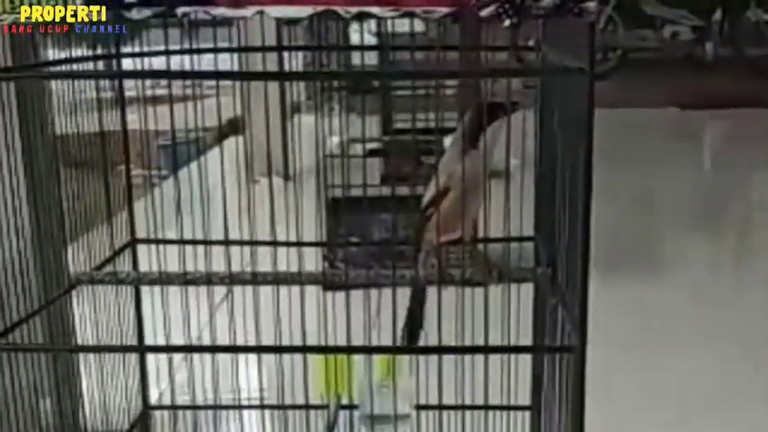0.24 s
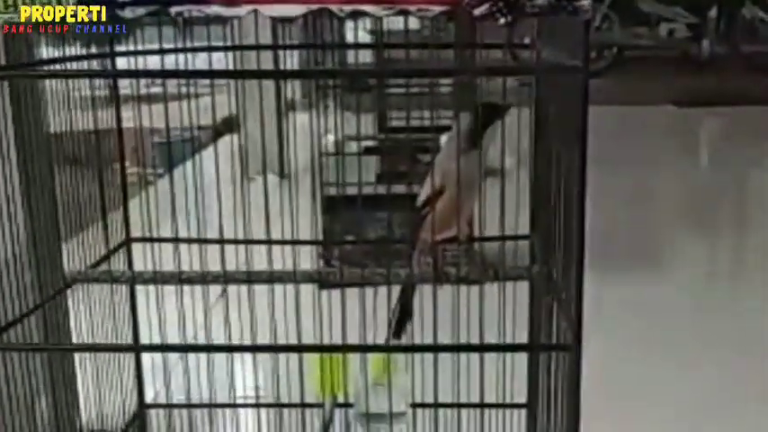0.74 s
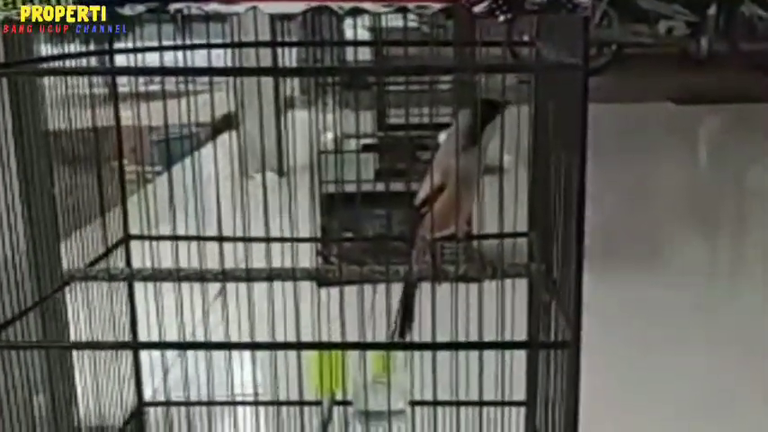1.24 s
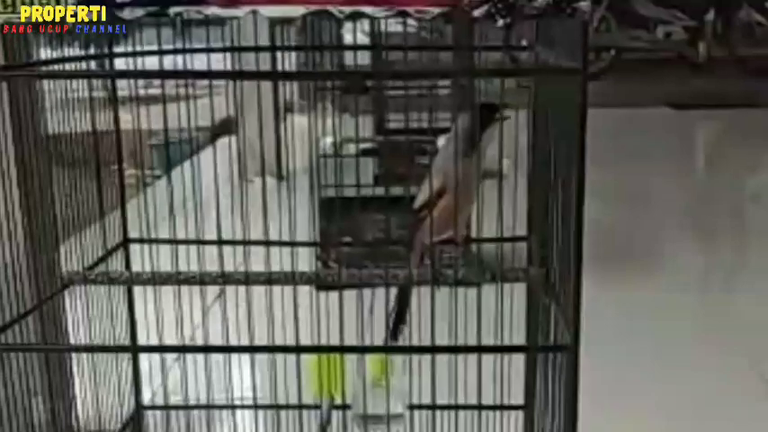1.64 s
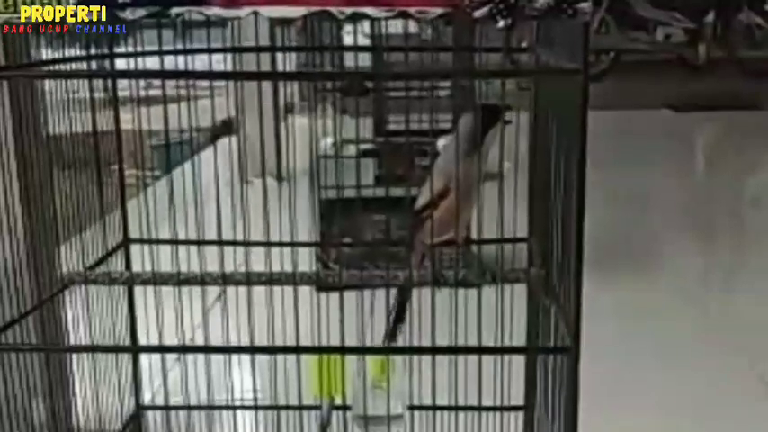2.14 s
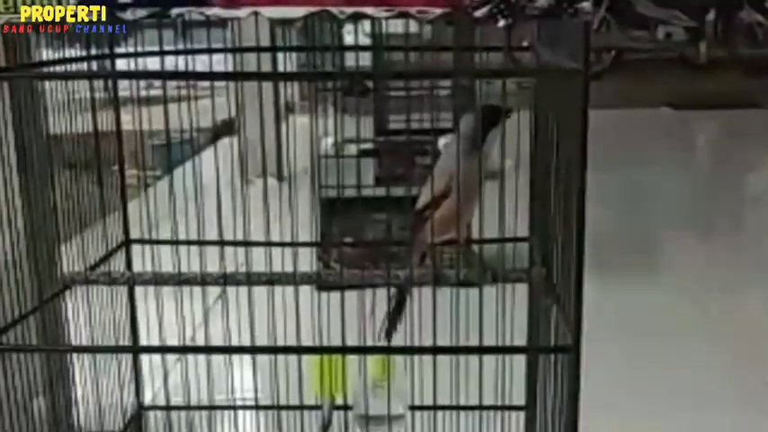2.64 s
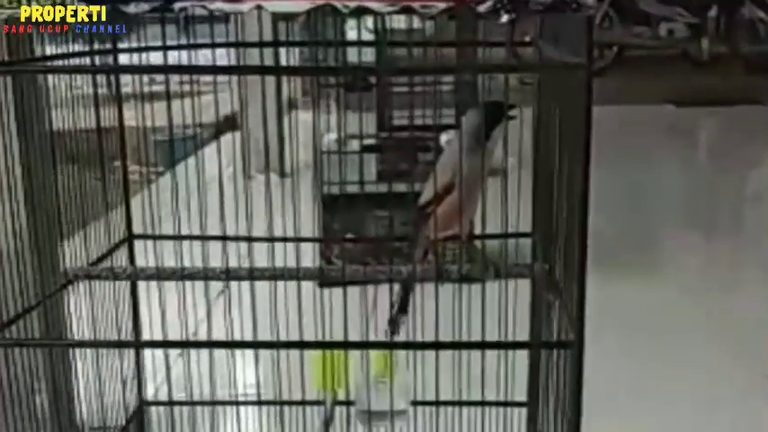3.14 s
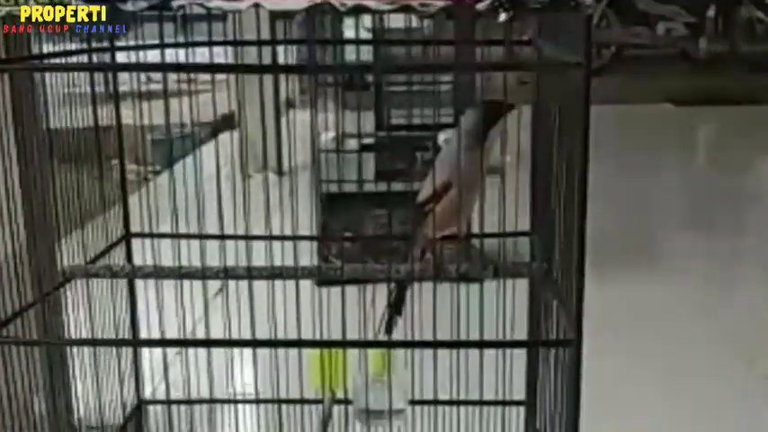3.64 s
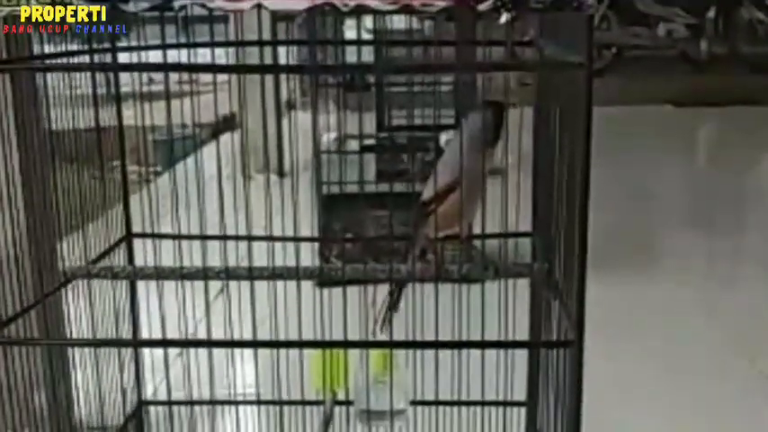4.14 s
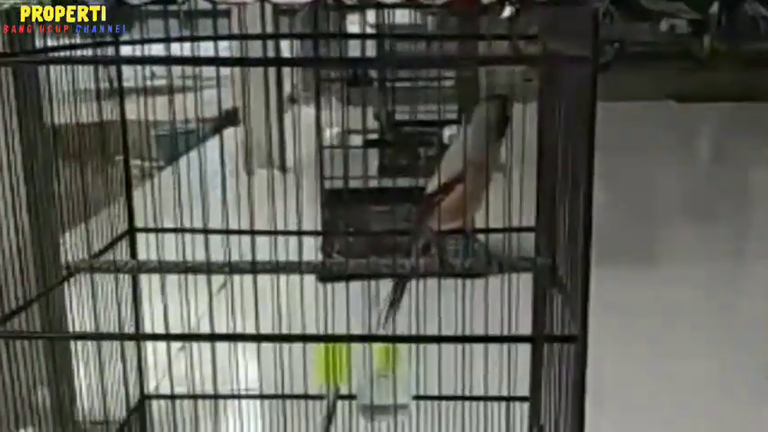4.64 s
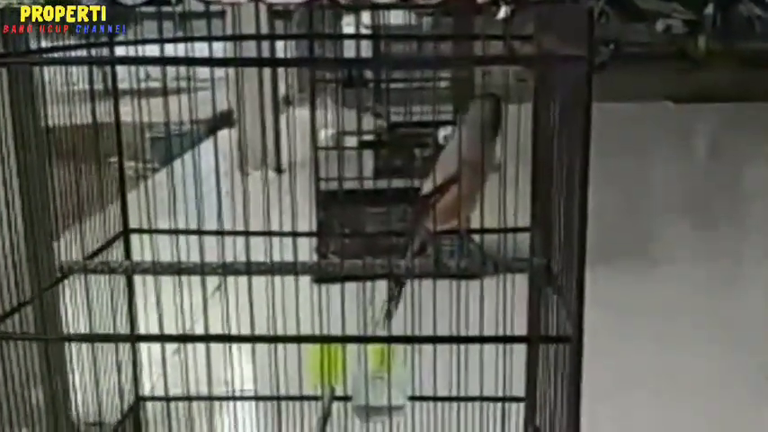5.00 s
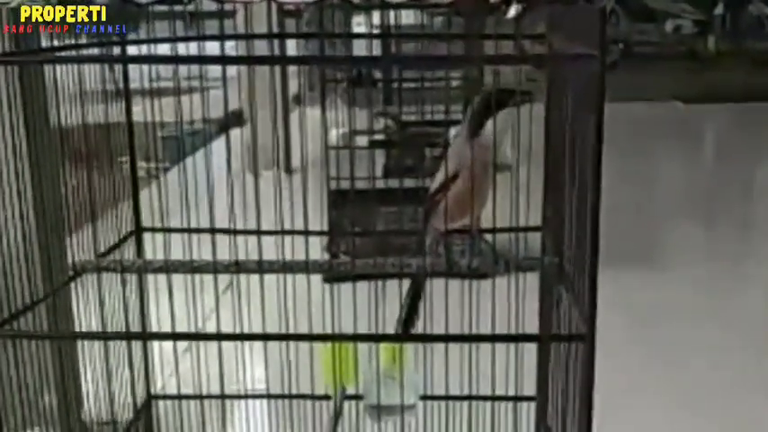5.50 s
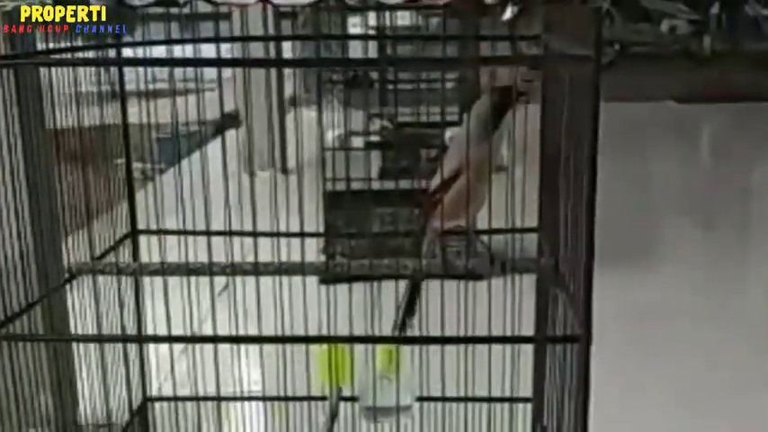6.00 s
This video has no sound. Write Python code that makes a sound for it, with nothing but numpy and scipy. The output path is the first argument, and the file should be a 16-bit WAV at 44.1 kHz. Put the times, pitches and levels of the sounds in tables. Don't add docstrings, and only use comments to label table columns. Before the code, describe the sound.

Close scratchy bird song with beak clicks rings off hard porch walls, over low traffic rumble, distant crowing and soft dove coos.

```python
import sys
import numpy as np
from scipy import signal
from scipy.fft import rfft, irfft
from scipy.io import wavfile
from scipy.ndimage import uniform_filter1d

SR = 44100
rng = np.random.default_rng(int(sys.argv[2]) if len(sys.argv) > 2 else 0)


def voltage_ratio(decibels):
    exponent = np.asarray(decibels, float) / 20
    return 10 ** exponent


def generate_wav(sig):
    pcm = np.round(np.clip(np.atleast_2d(sig).T, -1, 1) * 32767).astype(np.int16)
    wavfile.write(sys.argv[1], SR, pcm)


N = 276049
RUN_IN = 4410
POSES = 3


def at_hz(points, hz):
    table_hz, values = np.transpose(points)
    return np.interp(np.log(hz), np.log(table_hz), values)


def wobble(count, hz):
    slow = signal.lfilter([1], [1, -np.exp(-2 * np.pi * hz / SR)], rng.standard_normal(count + 300))[300:]
    return slow / slow.std()


def add(track, sound, s):
    i = RUN_IN + round(s * SR)
    track[i:i + len(sound)] += sound[:len(track) - i]


# frequency in Hz, level in dB.
OPEN_BEAK = [(1200, 5), (1600, -12.5), (2500, 0), (5000, 8), (6100, 4), (7000, -0.5), (8500, 7),
             (10100, 2.5), (11500, 10.5), (13000, 5.5), (14500, -5.5), (16000, -19)]
# frequency in Hz, level in dB.
SHUT_BEAK = [(1200, 3), (1800, -15), (3000, 13), (5600, -13.5), (7500, -5), (9500, -27), (11300, 8.5),
             (12500, 0.5), (14000, -1.5), (16000, 0.5)]


def syrinx(rows, colour=OPEN_BEAK):
    throat_width_hz, throat_skirt = 1790, 1.28
    pitch_jitter, overtone_scatter_db = 0.2155, 1.8
    breathy_rad, breathy_hz, flutter_db = 0.11, 328, 2
    s, *columns = np.transpose(rows)
    t = np.arange(s[0], s[-1], 1 / SR)
    hz, level_db, throat_hz, overtone_db, rough = [np.interp(t, s, column) for column in columns]
    hz = hz * (1 + pitch_jitter * rough * np.clip(wobble(len(t), 468), -2.5, 2.5))
    partials = np.arange(1, 15)[:, None] * hz

    throat = 1 / (1 + (2 * (partials - throat_hz) / throat_width_hz) ** 2) ** throat_skirt
    scatter_db = overtone_scatter_db * rng.standard_normal((len(partials), 1))
    heights = throat + voltage_ratio(overtone_db + at_hz(colour, partials) + scatter_db)
    heights *= partials < 16500
    heights /= np.sqrt(np.sum(heights ** 2, axis=0) / 2 + 1e-9)

    phases = 2 * np.pi * (np.cumsum(partials, axis=1) / SR + rng.random((14, 1)))
    for order in range(2, 14):
        phases[order] += breathy_rad * order * wobble(len(t), breathy_hz)
    level_db = level_db + flutter_db * rough * wobble(len(t), 280)
    edges = np.sin(np.clip(np.minimum(t - s[0], s[-1] - t) / .004, 0, 1) * np.pi / 2) ** 2
    return np.sum(heights * np.sin(phases), axis=0) * voltage_ratio(level_db) * edges


# time after the start in seconds, pitch in Hz,
# level in dB, throat resonance in Hz, overtone strength in dB, roughness from 0 to 1.
TICK_SHAPE = [(0, 3210, 0.5, 3150, -73, 0.17), (.009, 2786, -2.5, 5370, -15, 0.13),
              (.02, 2760, 4, 5350, -5.5, 0.08), (.026, 2243, 5, 4730, -40.5, 0.51),
              (.032, 2746, -6, 3940, 32, 0.39), (.04, 4360, 18.5, 4430, -14, 0.56)]
RISE_SHAPE = [(-.004, 1381, 9, 2660, -59, 0.039), (.004, 1515, -4, 2755, -19.5, 0.062),
              (.03, 1696, 1.5, 3350, -11, 0.067), (.04, 2038, 3, 3440, 3, 0.16),
              (.048, 2380, 0, 4750, -11.5, 0.094), (.06, 2486, 6.5, 4620, -12, 0.74)]
CHACK_SHAPE = [(-.004, 1848, -14, 4000, -28, 0.084), (.008, 2270, 2.5, 4730, 20, 0.073),
               (.024, 2454, -5, 5080, -47, 0.13), (.032, 2300, -24, 4670, -5, 0.875),
               (.038, 2700, 4.5, 5200, -25, .7), (.044, 3490, -6, 4440, -2, 0.98)]
OPENER_SHAPE = [(0, 1748, 5, 3610, -22, 0.063), (.006, 2015, 4, 4050, -22.5, 0.023),
                (.026, 2051, 2, 4063, -24, 0.02), (.032, 2150, -6, 2340, -5.5, 0.039),
                (.043, 2350, 0, 2350, -20, .03), (.052, 2780, -5.5, 2776, -25, 0.1),
                (.095, 2710, -8, 2700, -38, 0.33)]
DOUBLE_SHAPE = [(-.002, 1480, 8.5, 3280, 7, 0.057), (.007, 1829, 8.5, 3670, -16, 0.044),
                (.029, 1891, 8, 3870, -21, 0.027), (.035, 2105, -3, 2320, -13, 0.041),
                (.046, 2350, 7, 2350, -1, .03), (.06, 2724, -3.5, 2800, -51, 0.05),
                (.09, 2883, 2, 2830, -46, 0.089)]
STEP_SHAPE = [(0, 1444, -2, 3100, -16, 0.019), (.009, 1822, 2.5, 3470, -17, 0.025),
              (.034, 1860, 3, 3600, -34, 0.039), (.038, 2045, -9.5, 2300, -10, 0.027),
              (.047, 2335, 0, 2380, -18, .03), (.056, 2950, 2.5, 2900, -14, .05),
              (.066, 2730, -11, 2830, -35, .1), (.09, 2840, -8, 2750, -40, .15)]
CHECK_SHAPE = [(0, 1920, -10, 6100, -11, .15), (.007, 2282, 2.5, 6700, -5, 0.16),
               (.012, 2425, 4, 5000, -16, 0.16), (.022, 2560, -0.5, 5100, -17, .2),
               (.034, 2424, 5.5, 4840, 3, 1)]
BRIDGE_SHAPE = [(0, 1580, 0, 3140, -37, .03), (.007, 1754, -5.5, 3530, -17, 0.17),
                (.03, 1843, -3, 3310, -7.5, 0.024), (.04, 2150, -7, 4300, 10.5, .15),
                (.052, 2445, 4, 4400, -16, 0.52)]
LIFT_SHAPE = [(0, 1600, 0, 3230, 2, 0.049), (.02, 1890, 3.5, 3720, -8, 0.04),
              (.025, 2090, -7.5, 2100, -9, 0.037), (.036, 2140, 4, 2150, -2, 0.056),
              (.043, 2700, -5.5, 2750, -11, .08), (.048, 2990, 3, 2980, -14, 0.034),
              (.066, 3020, -1, 3020, -25, .06)]
HOARSE_SHAPE = [(0, 1100, -1, 3420, -29, 0.43), (.02, 1503, -2, 4170, -22, 0.37),
                (.044, 1530, -6, 4000, -18, .45)]
RASP_SHAPE = [(0, 1106, -9.5, 3630, -19, 0.033), (.013, 1556, 3.5, 2870, -31.5, 0.074),
              (.036, 1604, -4.5, 2920, -7, 0.06), (.05, 1525, -13.5, 3400, -3, 0.16),
              (.07, 1080, 3.5, 3600, -31, 0.72)]
MUTTER_SHAPE = [(0, 2324, -5, 4500, -34, 0.79), (.035, 2178, -5.5, 4430, -19, 0.41),
                (.065, 2036, 4, 4030, -26, 0.41)]
# start in seconds, level in dB, pitch factor, length factor.
TICKS = [(-0.033, -25, 0.96, 1), (0.133, -23.5, 1.05, .76), (0.269, -23.5, 0.94, 0.73),
         (0.417, -24.5, 0.95, 0.71), (0.562, -23.5, 0.93, 0.79), (0.721, -21, 0.96, 0.82),
         (4.272, -27, 1.03, 0.83), (4.439, -27, .93, 0.65), (4.585, -22.5, 0.9, 0.61),
         (4.73, -24.5, 0.92, 0.88), (4.884, -22.5, 0.92, 0.63)]
RISES = [(1.668, -21, 1.07, 0.85), (1.801, -21, 1.064, 0.77), (1.925, -20, 1.08, 1.01),
         (2.058, -22.5, 1.08, 0.88), (2.198, -22, 1.105, 0.93), (2.324, -22.5, 1.096, 1.04),
         (2.461, -21, 1.09, 0.88), (2.616, -19.5, 1.134, 0.79), (2.772, -20.5, 1.097, 0.89),
         (5.63, -20, 1.1, 0.85), (5.754, -20.5, 1.09, 0.96), (5.886, -20.5, 1.073, 0.78),
         (6.007, -22, 1.07, 0.81), (6.137, -22, 1.08, 0.97)]
CHACKS = [
    (3.374, -16, 1.0, .75),
]
OPENERS = [
    (.974, -22.5, .99, .94),
    (5.082, -23.5, 0.97, .82),
]
DOUBLES = [
    (1.133, -30, 1.0, 0.87),
    (5.234, -27.5, 1.01, 0.68),
]
STEPS = [
    (1.284, -22.5, 0.97, 0.86),
]
CHECKS = [
    (3.585, -17, 0.97, 0.94),
]
BRIDGES = [
    (1.429, -17, 0.98, 0.8),
    (1.548, -15.5, 0.99, 0.91),
    (5.507, -16, 1.02, 0.91),
]
LIFTS = [
    (5.384, -23, 0.96, 0.82),
]
HOARSE = [
    (3.188, -21.5, 0.92, 1),
]
RASPS = [
    (3.044, -21.5, 1.023, 1.06),
    (3.122, -21.5, 1.025, 0.89),
]
MUTTERS = [
    (0.904, -26, 1.01, 0.91),
]
# time in seconds, extra overtone strength in dB.
BEAK = [(0, 6), (1.0, 0), (1.13, -11), (1.29, 1.5), (1.43, -22.5), (1.55, -16), (1.95, -10.5), (2.8, -7.5),
        (3.05, -6.5), (3.4, 9), (3.6, -4), (4.9, 2), (5.1, -3.5), (5.4, -8), (5.51, -26.5), (5.64, -6.5),
        (6.2, -4)]


def sung_notes():
    pitch_scatter, level_scatter_db = .012, 2
    poses = np.zeros((POSES, RUN_IN + N))
    kinds = [(TICK_SHAPE, TICKS, .94, OPEN_BEAK), (RISE_SHAPE, RISES, .91, OPEN_BEAK),
             (CHACK_SHAPE, CHACKS, 1, OPEN_BEAK), (OPENER_SHAPE, OPENERS, 1, OPEN_BEAK),
             (DOUBLE_SHAPE, DOUBLES, 1, SHUT_BEAK), (STEP_SHAPE, STEPS, 1, SHUT_BEAK),
             (CHECK_SHAPE, CHECKS, 1, OPEN_BEAK), (BRIDGE_SHAPE, BRIDGES, 1, OPEN_BEAK),
             (LIFT_SHAPE, LIFTS, 1, SHUT_BEAK), (HOARSE_SHAPE, HOARSE, 1, OPEN_BEAK),
             (RASP_SHAPE, RASPS, 1, OPEN_BEAK), (MUTTER_SHAPE, MUTTERS, 1, OPEN_BEAK)]
    for shape, notes, sag, colour in kinds:
        for k, (s, level_db, pitch, length) in enumerate(notes):
            beak_db = np.interp(s, *np.transpose(BEAK))
            rows = np.array(shape) * [length, 1, 1, 1, 1, 1]
            rows = rows + [s, 0, level_db - 2, 0, beak_db + 8, 0]
            rows[:, [1, 3]] *= pitch * np.linspace(1, sag, len(rows))[:, None]
            if len(notes) > POSES:
                chance = rng.standard_normal((len(rows), 2))
                rows[:, [1, 3]] *= 1 + pitch_scatter * chance[:, :1]
                rows[:, 2] += level_scatter_db * chance[:, 1]
            add(poses[k % POSES], syrinx(rows, colour), rows[0, 0])
    return poses


# time after the start in seconds, pitch in Hz, level in dB, throat
# resonance in Hz, overtone strength in dB, roughness from 0 to 1.
GRACE_SHAPE = [(0, 1560, -10, 1550, -43, .02), (.012, 1700, -12, 1650, -40, .02),
               (.024, 1720, 4.5, 1740, -40, .02)]
# start in seconds, level in dB.
GRACES = [(0.154, -49), (0.445, -48), (0.599, -45), (0.874, -60), (4.25, -50), (4.41, -50), (4.561, -53),
          (4.712, -46), (4.86, -46.5), (5.041, -54)]


def grace_notes():
    out = np.zeros(RUN_IN + N)
    for s, level_db in GRACES:
        add(out, voltage_ratio(level_db) * syrinx(GRACE_SHAPE), s)
    return out


# start in seconds, length in seconds, first pitch in Hz, last pitch in Hz, level in dB.
SQUEAKS = [
    (3.838, 0.019, 6890, 5390, -16.5),
    (3.839, 0.012, 4830, 5130, -20),
    (3.853, 0.02, 3350, 4000, -27),
    (3.86, 0.016, 6400, 7590, -26),
]
WHISTLES = [
    (4.091, 0.0193, 7080, 5655, -21.5),
    (4.11, 0.0153, 6380, 6580, -18),
]


def squeaks():
    onset_db, end_db = -10.5, 1
    out = np.zeros(RUN_IN + N)
    # calls, overtone strength in dB, roughness
    for calls, overtone_db, rough in [(SQUEAKS, 0.56, 0.185), (WHISTLES, -14.5, 0.027)]:
        for s, length, first_hz, last_hz, db in calls:
            middle_hz = (first_hz + last_hz) / 2
            rows = [(0, first_hz, db + onset_db, first_hz, overtone_db, rough),
                    (length / 2, middle_hz, db, middle_hz, overtone_db, rough),
                    (length, last_hz, db + end_db, last_hz, overtone_db, rough)]
            add(out, syrinx(rows), s)
    return out


# time in seconds, peak level in dB.
SNAPS = [(.153, -17), (.292, -15), (.438, -19), (.738, -15), (1.342, -18), (1.464, -14), (1.717, -14),
         (2.502, -12), (2.515, -15), (2.71, -20), (3.126, -18), (3.403, -10), (3.865, -12), (4.294, -17),
         (4.598, -16), (4.759, -13), (4.91, -16), (5.432, -14), (5.552, -14)]


def snaps():
    clicks = np.zeros(RUN_IN + N) + 1e-18
    for s, level_db in SNAPS:
        add(clicks, voltage_ratio(level_db) * np.array([1., -1.]), s)
    return signal.sosfilt(signal.butter(2, [3000, 11100], "band", fs=SR, output="sos"), clicks)


def songbird():
    poses = sung_notes()
    poses[0] += grace_notes() + snaps()
    poses[1] += squeaks()
    return signal.sosfilt(signal.butter(3, 1200, "high", fs=SR, output="sos"), poses + 1e-18)


# frequency in Hz, time to fall 60 dB in seconds.
PORCH_T60 = [(1000, 0.29), (2000, 0.35), (4000, 0.42), (8000, 0.42), (14000, 0.33)]
# frequency in Hz, level in dB.
PORCH_COLOUR = [(1000, -4.5), (2200, -0.5), (4000, 0.5), (8000, -1), (14000, -0.5)]


def porch(x):
    port_lag, left_db = 6, 0.64
    near_walls_db, near_walls_t60_s, first_echo_s = 3, 0.085, .012
    shared = np.sqrt(0.043)
    t = np.arange(int(.8 * SR)) / SR
    white = rng.standard_normal((2, 3, len(t)))
    edges = 700 * 2 ** np.arange(0, 5, .5)
    tail = 0
    for k, (low, high) in enumerate(zip(edges, edges[1:])):
        centre = np.sqrt(low * high)
        band = signal.sosfilt(signal.butter(2, [low, high], "band", fs=SR, output="sos"), white[k % 2])
        tail = tail + band * voltage_ratio(at_hz(PORCH_COLOUR, centre) - 60 * t / at_hz(PORCH_T60, centre))
    tail = tail * (1 + voltage_ratio(near_walls_db - 60 * t / near_walls_t60_s))
    tail = tail * np.clip(t / first_echo_s, 0, 1)
    tail /= np.sqrt(np.sum(tail ** 2) / 3)
    common = shared * tail[0]
    common[0] = 1
    own = np.sqrt(1 - shared ** 2) * tail[1:]
    response = np.array([np.roll(common, port_lag), common]) + own
    heard = signal.fftconvolve(x[None], response, axes=1)[:, RUN_IN:RUN_IN + N]
    return heard * voltage_ratio([[left_db], [-left_db]])


def far_calls(calls, orders, hoarse):
    out = np.zeros(RUN_IN + N)
    for rows in calls:
        s, hz, level_db = np.transpose(rows)
        t = np.arange(s[0], s[-1], 1 / SR)
        unsteady_hz = np.interp(t, s, hz) * (1 + hoarse * wobble(len(t), 66))
        phase = 2 * np.pi * np.cumsum(unsteady_hz) / SR
        tone = sum(voltage_ratio(order_db) * np.sin(k * phase) for k, order_db in orders)
        edges = np.clip(np.minimum(t - s[0], s[-1] - t) / 0.017, 0, 1)
        add(out, tone * edges * voltage_ratio(np.interp(t, s, level_db)), s[0])
    return out[RUN_IN:]


def sliding_calls(calls):
    peak, onset_db, end_db = 0.64, 1.5, -13.5
    return [[(s, first_hz, db + onset_db),
             (s + peak * length, first_hz + peak * (last_hz - first_hz), db),
             (s + length, last_hz, db + end_db)] for s, length, first_hz, last_hz, db in calls]


# start in seconds, length in seconds, first pitch in Hz, last
# pitch in Hz, level in dB.
COCK_LOW = [(.43, 0.25, 1082, 1140, -62), (.85, 0.44, 1104, 1109, -61.5), (1.17, 0.21, 1126, 1120, -59),
            (1.4, 0.1, 1077, 1100, -55), (1.69, 0.11, 1082, 1160, -57), (1.9, 0.59, 1085, 1081, -61),
            (2.4, 0.22, 1097, 1097, -57.5), (2.67, 0.13, 1073, 1098, -53), (2.86, 0.18, 1090, 1096, -55.5),
            (3.1, 0.25, 1103, 1086, -55), (3.46, 0.43, 1081, 1076, -52.5)]
COCK_HIGH = [
    (3.24, 0.22, 1600, 1510, -56),
    (3.92, .4, 1590, 1523, -53.5),
]


def cockerels():
    low = far_calls(sliding_calls(COCK_LOW), [(.5, -16.5), (1, 0), (1.5, -4.5)], hoarse=0.017)
    high = far_calls(sliding_calls(COCK_HIGH), [(.5, -7.0), (1, 4.0)], hoarse=0.0084)
    return low + high


# time after the start in seconds, pitch in Hz, level in dB.
COO = [
    [(0, 630, -57), (.04, 640, -50), (.1, 640, -71)],
    [(.3, 620, -62), (.34, 640, -49), (.39, 730, -46.5), (.46, 720, -46.5), (.5, 640, -45), (.54, 620, -59)],
    [(.72, 620, -49), (.8, 640, -58.5), (.92, 670, -51), (1.04, 635, -48.5), (1.15, 600, -57),
     (1.27, 540, -56.5)],
]
COO_STARTS = [
    .74,
    4.97,
]
# start in seconds, length in seconds, first
# pitch in Hz, last pitch in Hz, level in dB.
STRAY_TONES = [
    (2.4, 0.19, 620, 582, -55.5),
    (2.95, 0.13, 616, 664, -59.5),
    (3.11, 0.193, 777, 680, -56),
    (4.22, 0.26, 715, 685, -63),
]


def dove():
    phrases = [np.array(note) + [start, 0, 0] for start in COO_STARTS for note in COO]
    return far_calls(phrases + sliding_calls(STRAY_TONES), [(1, 0)], hoarse=.04)


# start in seconds, length in seconds, first pitch in Hz, last pitch in Hz, level in dB.
FAR_CHIRPS = [
    (3.95, 0.068, 3140, 3250, -45),
    (4.06, 0.11, 2516, 2710, -47.5),
    (4.225, 0.053, 2755, 2930, -46),
]


def small_bird():
    return far_calls(sliding_calls(FAR_CHIRPS), [(0.98, 0.0029)], hoarse=0.021)


def yard(x):
    t = np.arange(int(.5 * SR)) / SR
    echoes = rng.standard_normal((2, len(t))) * voltage_ratio(-60 * t / .6)
    echoes /= np.sqrt(np.sum(echoes ** 2) / 2)
    echoes[:, 0] = .6
    return signal.fftconvolve(x[None], echoes, axes=1)[:, :N] * voltage_ratio([[-1.2], [1.2]])


# time in seconds, level in dB.
LORRY = [
    (5.4, -67),
    (5.9, -61),
    (6.26, -53.5),
]


def lorry():
    drone = signal.sosfilt(signal.butter(2, [30, 183], "band", fs=SR, output="sos"), rng.standard_normal(N))
    return drone / drone.std() * voltage_ratio(np.interp(np.arange(N) / SR, *np.transpose(LORRY)))


# frequency in Hz, level in dB per Hz.
RUMBLE = [(12, -4), (28, 5), (42, -16), (62, 4), (80, 1.5), (125, -6), (170, -11.5), (260, -17.5),
          (480, -22.5), (900, -21), (1350, -24.5), (2500, -12), (6000, -18), (11000, -20.5), (16000, -51)]
# time in seconds, level in dB.
RUMBLE_LEVEL = [(0, -48), (1.5, -46), (3.0, -45), (4.349, -46), (4.75, -50), (5.403, -47), (5.549, -43.5),
                (6.26, -46)]
# frequency in Hz, left-right likeness from 0 to 1.
LIKENESS = [(60, 0.9), (130, 1), (290, 0.69), (640, 0.58), (1400, 0.023)]


def rumble():
    hz = np.arange(N // 2 + 1) * SR / N + 1
    alike = at_hz(LIKENESS, hz)
    mid, side = rfft(rng.standard_normal((2, N))) * voltage_ratio(at_hz(RUMBLE, hz))
    pair = irfft(np.sqrt(1 + alike) * mid + np.sqrt(1 - alike) * side * [[1], [-1]], N)
    return pair / pair.std() * voltage_ratio(np.interp(np.arange(N) / SR, *np.transpose(RUMBLE_LEVEL)))


def scene():
    bird = sum(porch(pose) for pose in songbird())
    return bird + yard(dove() + cockerels() + small_bird()) + rumble() + lorry()


FRAME, FRAME_START = 1024, 922


def frames_in(spans):
    frame_count = (np.arange(N) + FRAME - FRAME_START) // FRAME
    centres = (FRAME_START + FRAME * (frame_count - .5)) / SR
    inside = sum((centres > start) & (centres < start + length) for start, length, *_ in spans)
    return uniform_filter1d(1. * (inside > 0), size=FRAME // 2)


# frequency in Hz, level in dB.
MASK = [(1000, -16.5), (3500, -27), (5000, -9), (7000, -6.5), (10000, -2), (12000, -10.5), (14500, -4.5)]
# start in seconds, length in seconds, lowest frequency in Hz, highest frequency in Hz.
STARVED = [(.92, .055, 7000, 7900), (1.14, .12, 8000, 10200), (1.27, .16, 7800, 10500),
           (1.3, .11, 5950, 6300), (1.31, .08, 4900, 5150), (1.3, .07, 4200, 4450), (3.62, .2, 9700, 10800),
           (3.97, .1, 8000, 8500), (5.4, .11, 9400, 10400), (5.4, .1, 5300, 5700), (5.4, .06, 8700, 9000)]


def hide_masked_bands(x):
    starved_db = 4
    _, s, cells = signal.stft(x, SR, nperseg=FRAME)
    power = np.sum(np.abs(cells[:, :FRAME // 2]) ** 2, axis=0)
    power = power.reshape(FRAME // 8, 4, -1).sum(axis=1) + 1e-20
    power = uniform_filter1d(power, size=4, axis=1)
    hz = (np.arange(FRAME // 8)[:, None] + .5) * 4 * SR / FRAME
    spare_db = 10 * np.log10(power / uniform_filter1d(power, size=11, axis=0)) - at_hz(MASK, hz)
    for start, length, low_hz, high_hz in STARVED:
        in_time = (s > start) * (s < start + length)
        spare_db -= starved_db * in_time * (hz > low_hz) * (hz < high_hz)
    gain = np.clip(spare_db, .02, 1)
    gain[:5] = 1
    cells[:, :FRAME // 2] *= np.repeat(gain, 4, axis=0)
    return signal.istft(cells, nperseg=FRAME)[1][:, :N]


def band_limit(x):
    return signal.sosfilt(signal.butter(12, 16260, fs=SR, output="sos"), x)


# start in seconds, length in seconds, level in dB (not used).
TOP_KEPT = [(0.137, 0.04, -47), (0.268, 0.034, -49), (0.42, 0.036, -49), (0.721, 0.078, -43),
            (1.128, 0.112, -42), (1.278, 0.32, -41), (1.695, 0.05, -58), (1.915, 0.058, -46),
            (2.048, 0.054, -51), (2.19, 0.094, -51), (2.332, 0.078, -52), (2.635, 0.04, -57),
            (2.783, 0.046, -48), (3.369, 0.116, -44), (3.579, 0.138, -40), (3.834, 0.046, -43),
            (5.119, 0.036, -54), (5.235, 0.08, -46), (5.379, 0.31, -40), (5.744, 0.062, -46),
            (5.87, 0.064, -50), (6.159, 0.076, -51)]
# start in seconds, length in seconds.
TOP_BRIEF = [(0, .11), (1.0, .04), (2.45, .06), (3.0, .08), (4.27, .04), (4.45, .03), (4.63, .03)]
# start in seconds, length in seconds.
TOP_LOST = [(1.6, .06), (1.98, .09), (3.12, .25), (3.78, .06), (4.13, .14)]


def record(dry):
    top_cut = signal.cheby2(10, 45, 14150, fs=SR, output="sos")
    low_cut = signal.cheby2(10, 45, 12900, fs=SR, output="sos")
    top_band = signal.cheby2(6, 50, [13250, 15900], "band", fs=SR, output="sos")
    lost = frames_in(TOP_LOST)
    kept = (1 - lost) * signal.sosfilt(top_cut, dry) + lost * signal.sosfilt(low_cut, dry)
    top = voltage_ratio(-1.5) * frames_in(TOP_KEPT + TOP_BRIEF) * signal.sosfilt(top_band, dry)
    return band_limit(hide_masked_bands(kept + top))


dry = scene()
out = record(dry)
generate_wav(out)
```